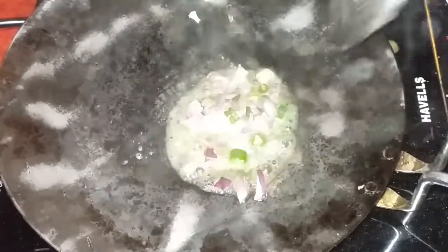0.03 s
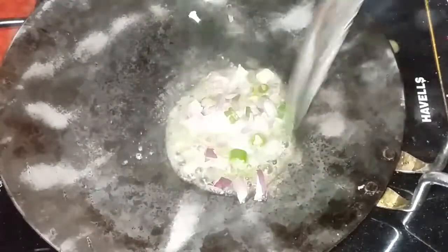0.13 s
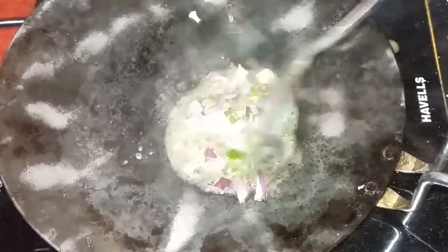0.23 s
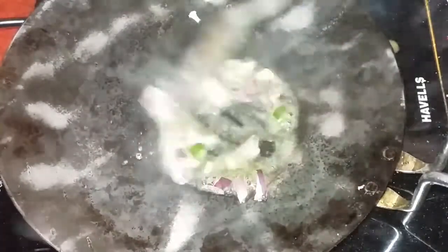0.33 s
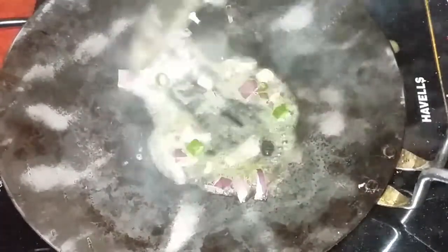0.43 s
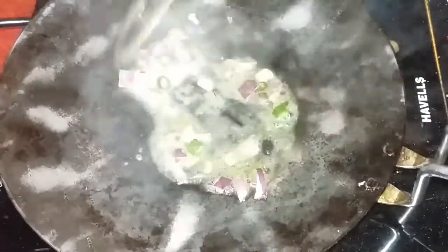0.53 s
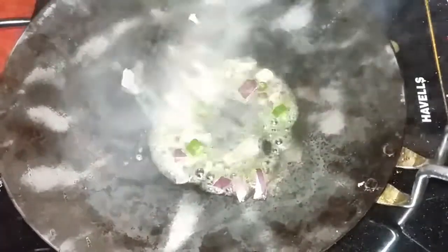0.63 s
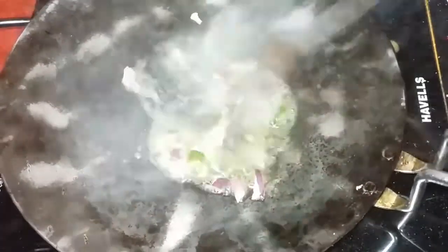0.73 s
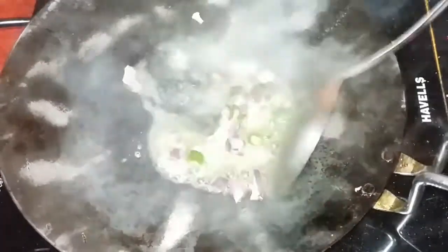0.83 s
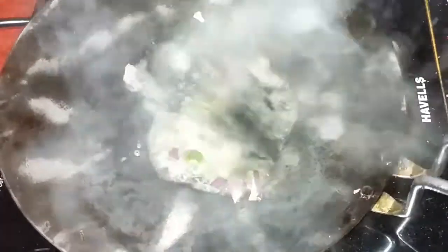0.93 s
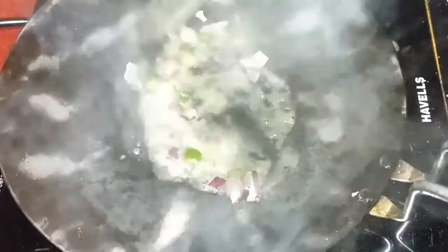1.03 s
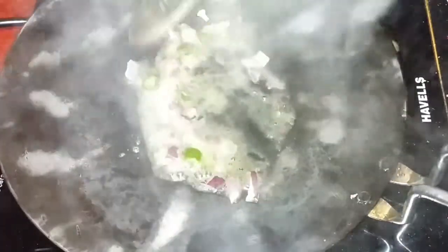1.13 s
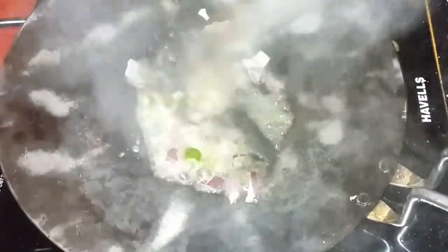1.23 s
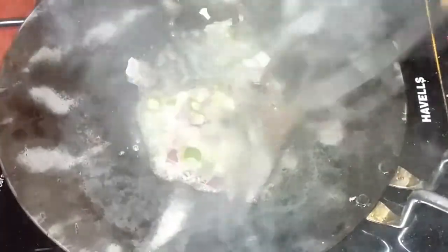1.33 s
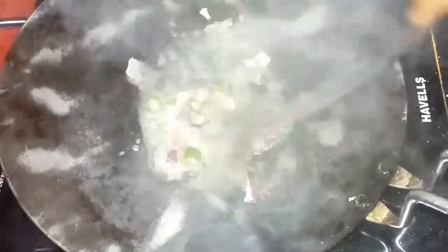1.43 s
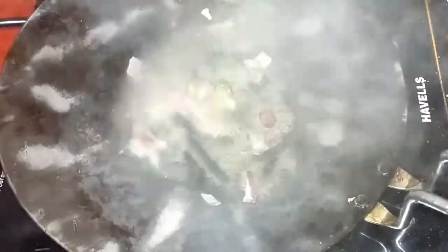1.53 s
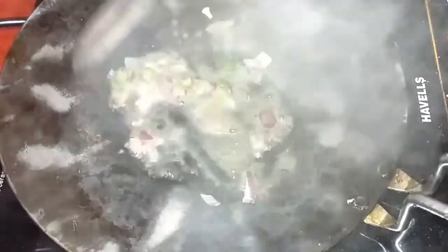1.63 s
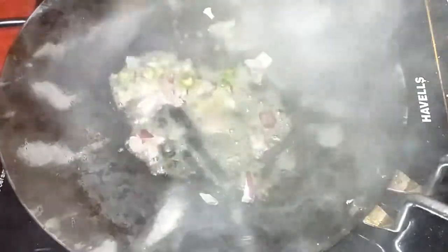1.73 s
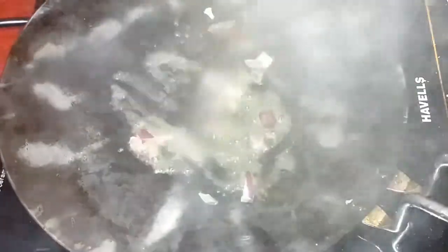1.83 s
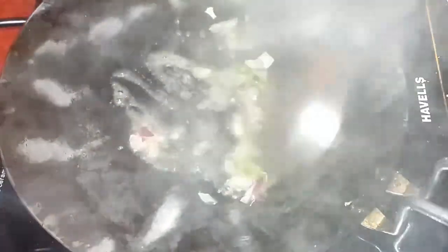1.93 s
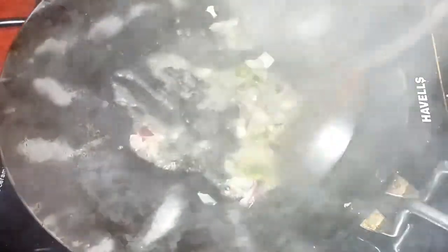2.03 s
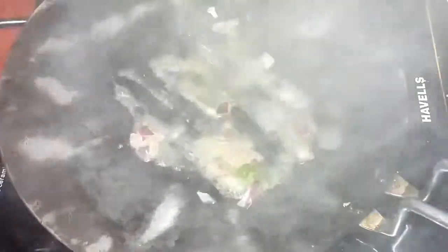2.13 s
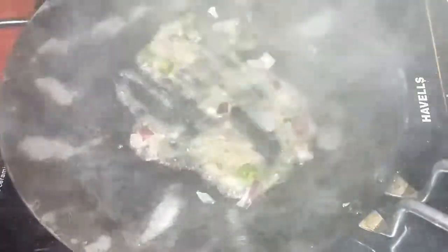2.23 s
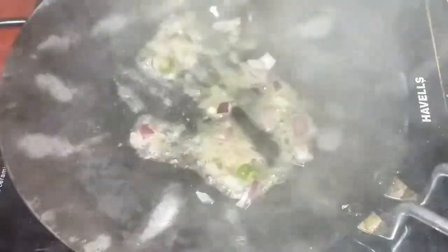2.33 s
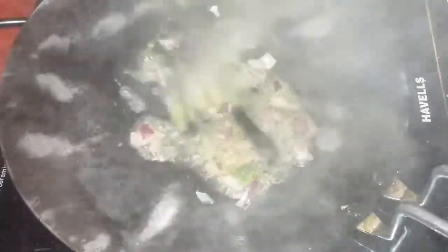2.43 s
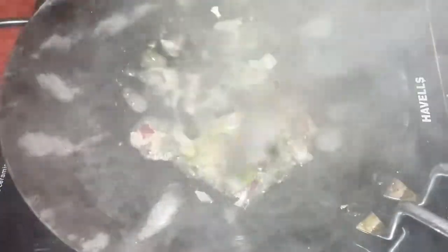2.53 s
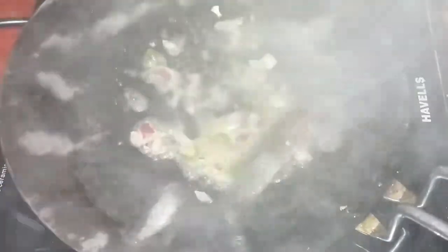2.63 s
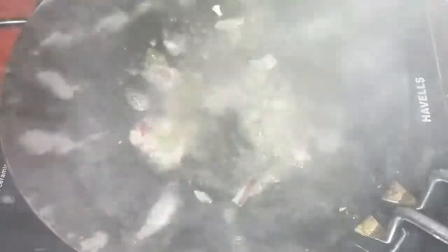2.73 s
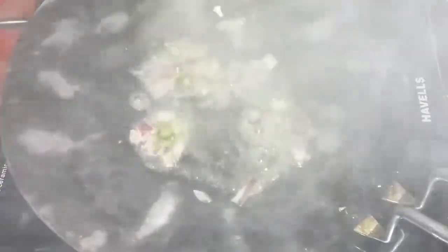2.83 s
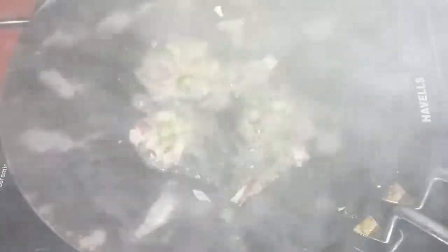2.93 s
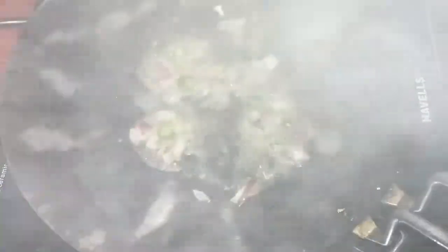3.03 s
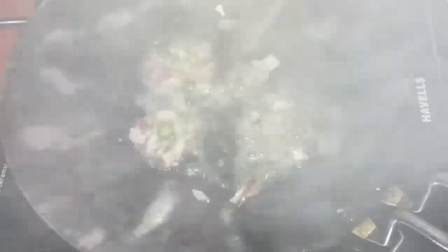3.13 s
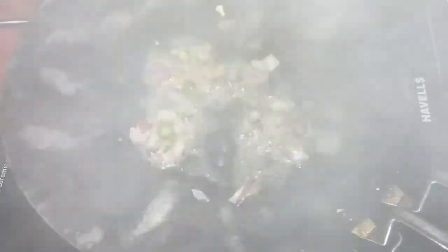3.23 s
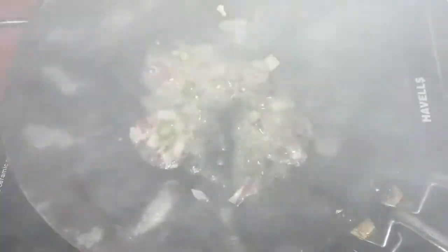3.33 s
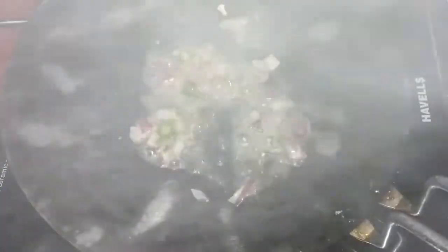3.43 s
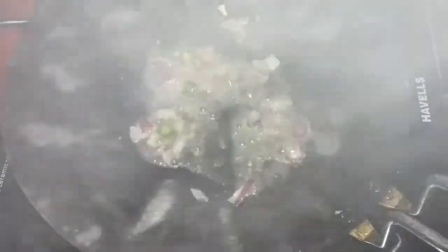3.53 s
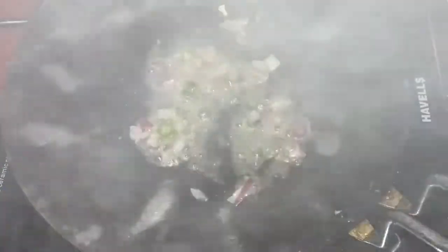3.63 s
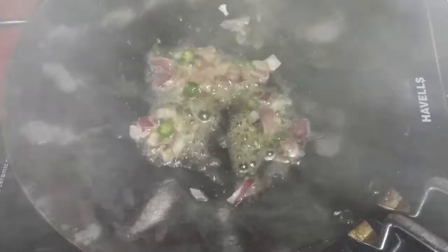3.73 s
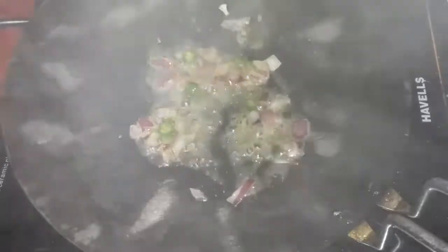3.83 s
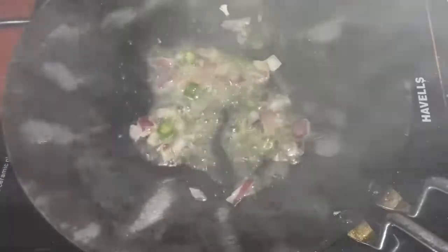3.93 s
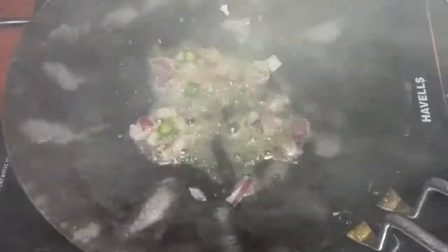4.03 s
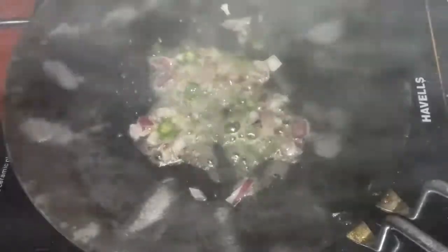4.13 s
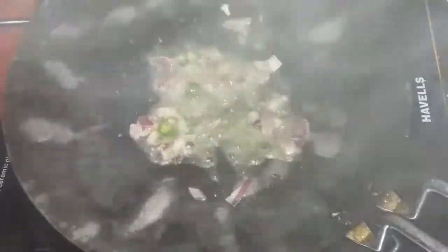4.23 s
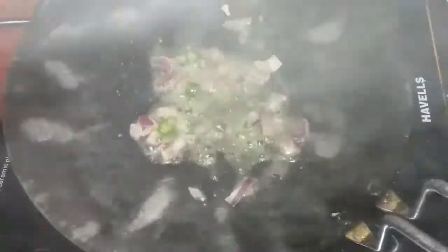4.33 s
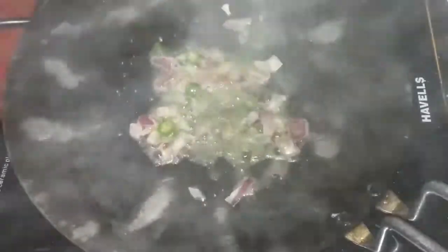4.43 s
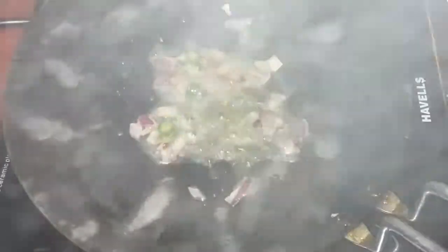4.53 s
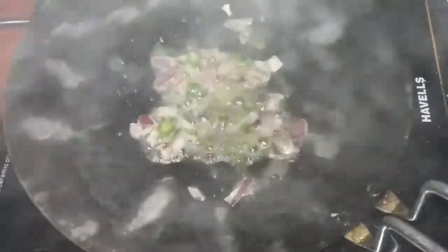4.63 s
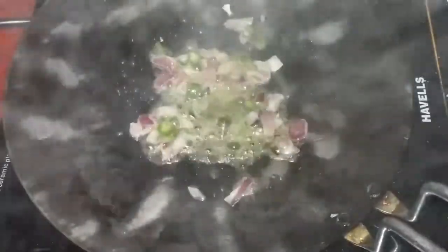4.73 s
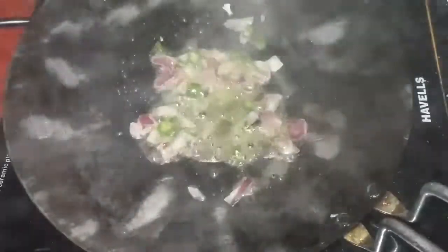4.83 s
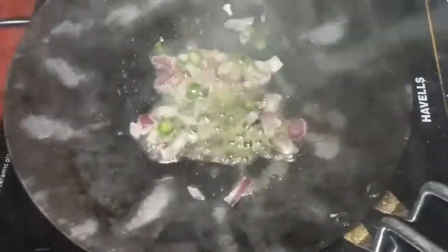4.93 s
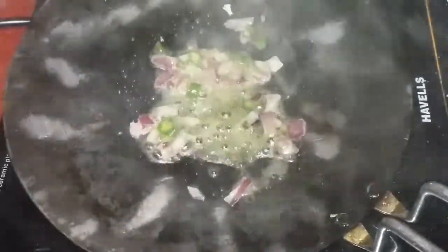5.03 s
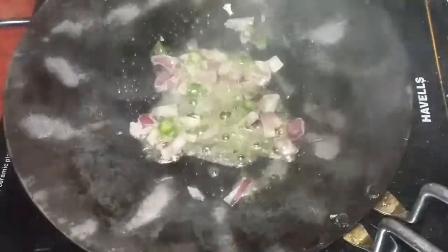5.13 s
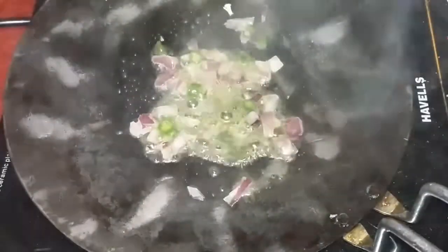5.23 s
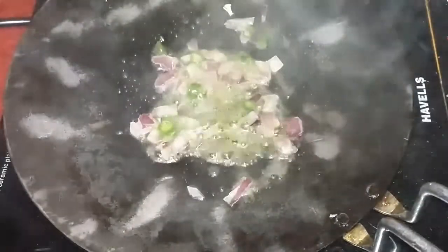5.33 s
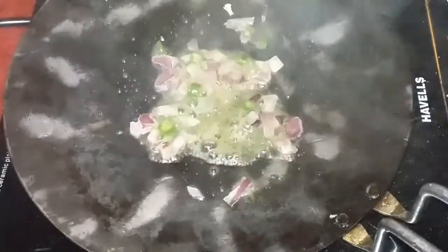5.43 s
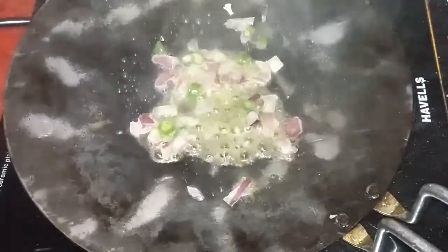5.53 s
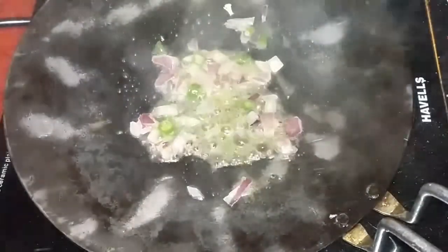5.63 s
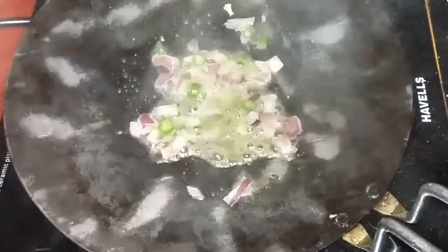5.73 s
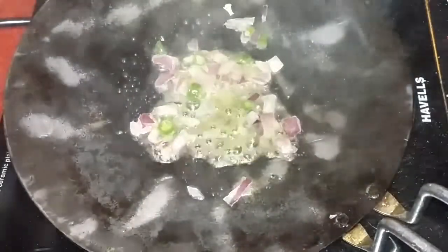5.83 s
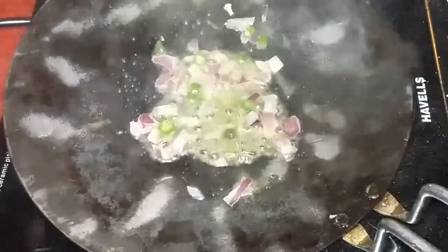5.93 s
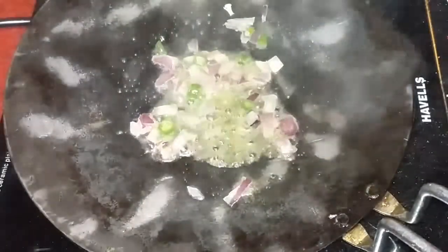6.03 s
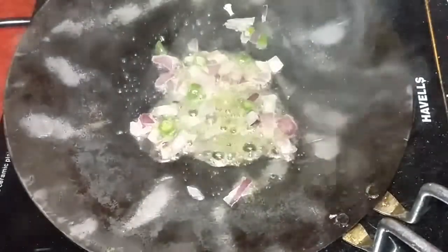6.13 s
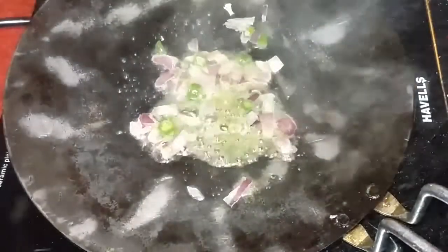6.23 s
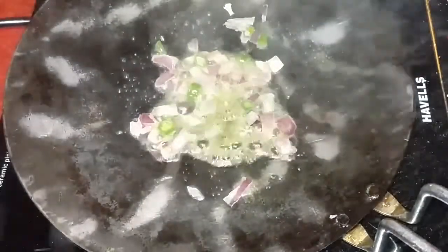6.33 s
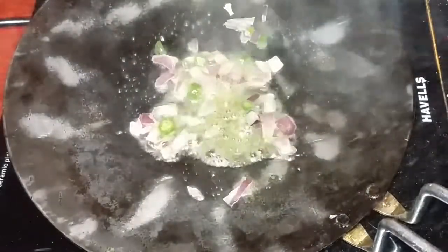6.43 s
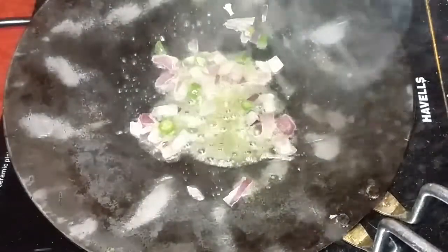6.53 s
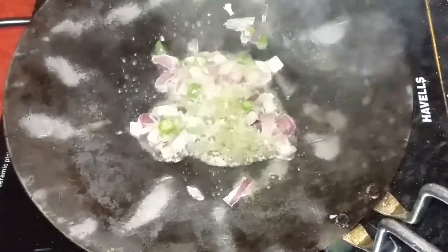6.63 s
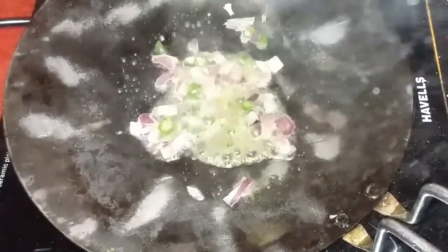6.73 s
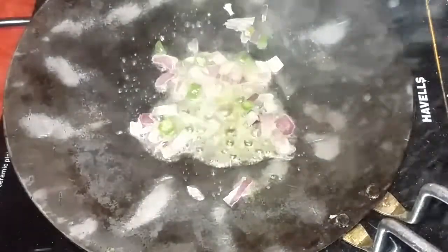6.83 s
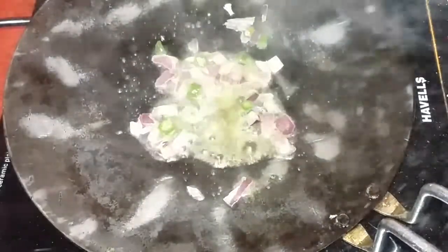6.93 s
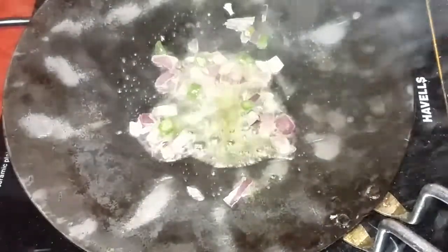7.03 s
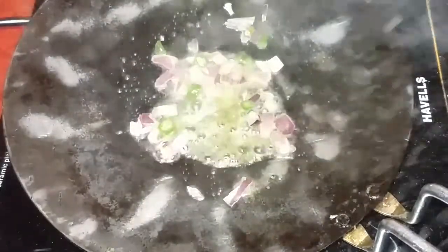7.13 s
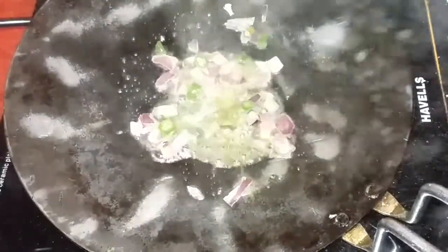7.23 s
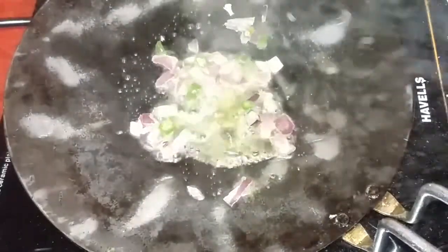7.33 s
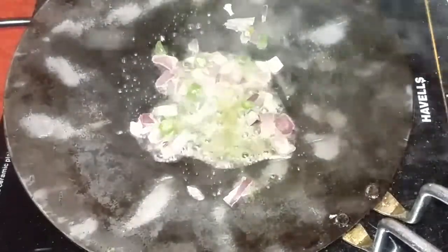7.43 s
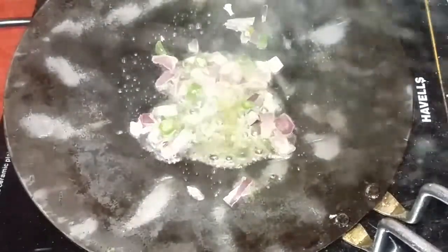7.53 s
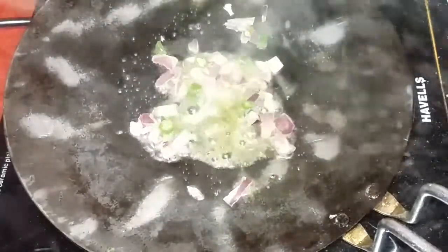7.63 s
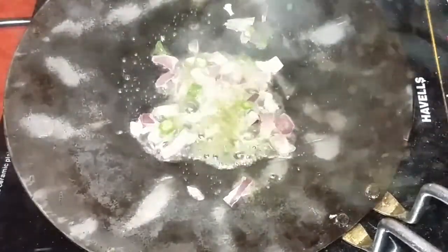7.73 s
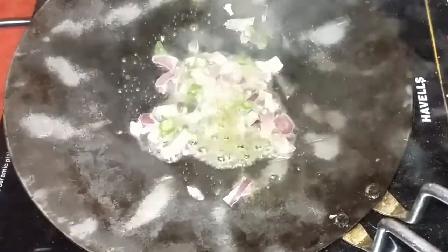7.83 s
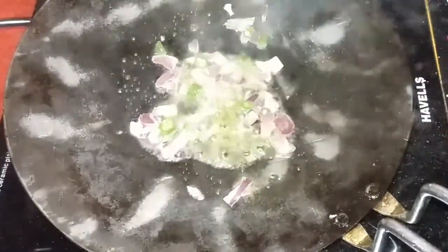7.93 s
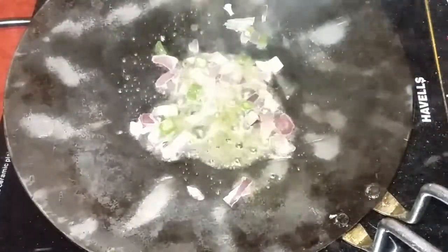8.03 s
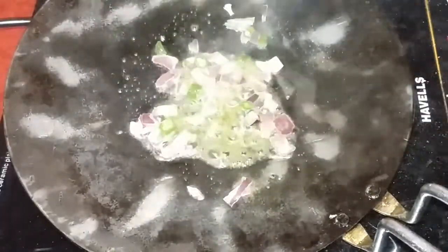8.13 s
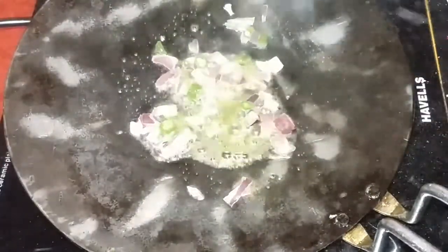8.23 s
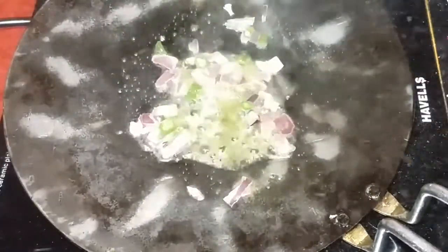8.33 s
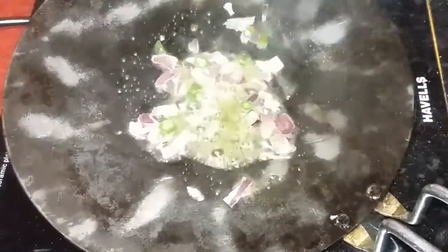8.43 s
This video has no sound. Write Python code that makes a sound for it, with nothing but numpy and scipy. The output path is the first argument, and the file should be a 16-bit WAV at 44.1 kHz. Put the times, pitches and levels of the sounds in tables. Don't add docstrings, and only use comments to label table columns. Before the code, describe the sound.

A steel ladle taps and drags on a hot iron pan, the wet frying surges into loud hiss, then settles to crackling under steady fan hum.

```python
import sys
import numpy as np
from scipy import signal
from scipy.fft import rfft, irfft
from scipy.io import wavfile
from scipy.ndimage import uniform_filter1d, map_coordinates

SR = 44100
rng = np.random.default_rng(int(sys.argv[2]) if len(sys.argv) > 2 else 0)


def materialize(psi):
    bounded = np.clip(np.atleast_2d(psi).T, -1, 1)
    quanta = np.round(bounded * 32767).astype(np.int16)
    wavfile.write(sys.argv[1], SR, quanta)


def invert_db(x):
    u = np.asarray(x, float) / 20
    return 10 ** u


N = 374850

# [f/Hz, level/dB per Hz]
FAN_AIR = [(20, -38), (45, -23.5), (100, -16.5), (170, -14.5), (260, -11), (385, -8), (415, -0.5),
           (500, -2.5), (530, -5.5), (650, -6.5), (900, -8.5), (1150, -7), (1450, -14), (2600, -24.5),
           (4000, -58)]
# [multiple, level/dB against the air noise]
FAN_ORDERS = [(7, -16), (8, -18), (9, -21), (12, -11), (14, -21), (16, -21), (17, -23), (20, -18),
              (21, -14), (22, -21), (24, -24), (28, -4), (30, -26), (32, -27)]
FAN_HZ, FAN_DB = 39.37, -41
BLADE_DB, HUM_DB = 0.16, 0.23

# [f/Hz, level/dB per Hz]
SIZZLE_COLOUR = [(300, -70), (900, -15.5), (1700, -8), (2300, -2.5), (3300, -3), (5000, -1), (6800, -2.5),
                 (8200, -10), (9500, -29), (13000, -60)]
# [f/Hz, level/dB per Hz]
HISS_COLOUR = [(1000, -70), (4000, -36), (7000, -7.5), (8800, -3.5), (10500, 0.5), (12500, 1.5),
               (14000, -.6), (16000, .4)]
TINIEST_HZ = 18000
# [f/Hz, width/Hz, level/dB]
PAN_RING = [(2280, 34, -22.5), (2730, 130, -25.5), (3430, 40, -36), (7000, 220, -29)]
# [t/s, sizzle level/dB]
SIMMER = [(0, -45.5), (.36, -42.5), (.45, -35.5), (1.75, -35.5), (2.1, -35), (2.75, -36.5), (3.2, -36.5),
          (4.0, -37.5), (4.66, -39), (5.2, -42), (6.65, -44.5), (8.5, -47.5)]
# [t/s, sizzle surge/dB, hiss surge/dB, hold/s]
STROKES = [
    (0.405, 6, 6, 0.2),
    (0.993, 6.5, 6.5, 0.17),
    (1.61, 2.5, 2, .12),
    (2.165, 3.5, 5.5, 0.17),
]
HISS_DB, HISS_FOLLOWS, SIMMER_MID_DB = -37.5, 1.27, -38
SURGE_RISE_S, SIZZLE_RISE_S, SURGE_FALL_S = 0.037, 0.091, 0.094

# [t/s, peak level/dB, f/Hz]
EARLY_SPITS = [(0.1096, -34, 6140), (0.1303, -25, 4400), (0.215, -29, 4800), (0.2696, -24, 5420),
               (0.389, -27, 4480), (0.4429, -20, 4530), (0.46, -17, 3970), (0.5102, -16, 4270),
               (0.5461, -16, 3950), (0.5846, -19, 3400)]
# [t/s, peak level/dB, f/Hz]
SPITS = [(3.1015, -24, 5670), (3.2693, -27, 4670), (3.4928, -41, 3630), (3.5142, -24, 5210),
         (3.532, -26, 5190), (3.5874, -25, 5070), (3.6104, -28, 4810), (3.624, -23, 5100),
         (3.7063, -26, 4720), (4.079, -27, 5800), (4.4447, -37, 5690), (4.458, -27, 4330),
         (4.5116, -32, 6150), (4.5399, -25, 6990), (4.6172, -28, 4800), (4.7548, -34, 3950),
         (4.8735, -26.5, 5940), (4.965, -31, 6220), (4.98, -29, 6240), (5.121, -25.5, 6670),
         (5.2304, -27, 6290), (5.5746, -31, 6750), (5.9815, -30, 5300), (6.2185, -26, 6310),
         (6.3943, -33, 6220), (6.423, -26, 6760), (6.6043, -33, 5580), (6.7108, -23.5, 4800),
         (7.5531, -32, 4450), (8.4798, -25.5, 6760)]
# [t/s, peak level/dB, f/Hz]
POPS = [(3.1222, -30, 2450), (3.2693, -26.5, 3000), (3.7062, -31, 3250), (4.0376, -30, 3220),
        (4.08, -27, 2430), (4.1917, -36, 2700), (4.2531, -30, 2310), (4.8572, -27, 2720),
        (4.8887, -27, 2970), (5.2493, -28, 2870), (5.575, -30, 2730), (5.9228, -30, 2870),
        (6.2242, -29, 2960), (6.703, -30, 2960), (6.7776, -29.5, 3050), (6.8796, -33.5, 2590),
        (7.2074, -39, 3350), (7.554, -33, 2750), (7.652, -37, 2760), (8.481, -33, 2270)]
# [t/s, peak level/dB]
SNAPS = [(0.2768, -21), (0.3885, -19), (0.4399, -17), (0.5447, -14), (0.5846, -23), (0.9971, -28),
         (1.0176, -20), (1.1672, -27), (1.6207, -25), (1.8033, -28), (3.1243, -26), (3.268, -27),
         (3.3902, -21), (3.4436, -33), (3.4935, -21), (3.705, -15), (3.769, -15), (3.9215, -15),
         (4.0435, -15), (4.2188, -31), (4.2617, -29), (4.2981, -21), (4.4732, -20), (4.8713, -27),
         (4.9983, -29), (5.1201, -28), (5.2004, -29), (5.4004, -29), (5.6853, -32), (5.7262, -33),
              (5.8669, -33), (5.9796, -31), (6.2989, -31), (6.3553, -23), (6.4216, -32), (6.454, -27),
              (6.5513, -27), (6.5807, -33), (6.6037, -30), (6.701, -15), (6.7349, -32), (6.8362, -31),
              (6.8786, -36), (6.9444, -32), (6.9918, -25), (7.2073, -26), (7.2372, -27), (7.4258, -31),
              (7.8194, -26), (8.4794, -26)]
EARLY_CYCLES, SPIT_CYCLES, POP_CYCLES = 3.6, 2.6, 1.6
STRAYS, STRAY_DB, STRAY_SPREAD_DB = 60, 14.0, 4.0
STRAYS_FROM_S = 2.8
TICKS_PER_S, TICK_DB, TICK_FOLLOWS = 120, -23.5, .6

# [t/s, delay/ms, share 0-1]
ECHO = [(0, 0.42, 0.04), (4.4, .41, .06), (4.75, 0.46, .15), (5.0, .3, 0.1), (5.9, 0.39, 0.1),
        (7.1, 0.374, 0.15), (7.42, 0.48, 0.26), (7.62, .39, 0.18), (8.5, .34, 0.1)]

# [f/Hz, time to fall 60 dB/s]
IRON = [(409, .15), (705, 0.14), (1098, 0.27), (1500, 0.03), (1852, 0.2), (2300, .12), (2417, 0.081),
        (2590, 0.11), (2697, 0.079), (2869, 0.072), (3030, 0.085), (3290, 0.16), (3610, 0.092),
        (3930, 0.13), (4510, .08), (4750, 0.12), (5350, .08), (5520, 0.064), (6470, 0.14), (6700, 0.065),
        (7400, 0.096), (7720, 0.17)]
# [t/s, tap level/dB, drag start level/dB, drag end level/dB, drag length/s]
CONTACTS = [
    (0.387, -54, -36, -35.5, 0.12),
    (0.5837, -17, -23.5, -25.5, 0.056),
    (0.638, -38, -20, -20, 0.029),
    (.8955, -17.5, -18.5, -35, 0.05),
    (1.142, -18, -16.5, -43, 0.072),
    (1.428, -15, -17, -42, 0.081),
    (1.7856, -13, -21, -24.5, 0.048),
    (1.853, -28.5, -20, -30, 0.024),
]
PRESSED_RING = [0.53, 0.61, 0.9, 0.56, 0.62, 0.55, 0.63, 0.47]
SWING_DB = [-4, -12.5, -6.5, -29, -12, 1.5, -1, 7, 3.5, 3.5, -1.5, -5, 0.5, -0.5, 1, -7, -3, -0.5, -2.5, -5,
            -7, -11]
SWINGING = [(2300, 2697, 3610, 4510), (2300, 2590, 2869, 3290), (2300, 5520, 6700),
            (1098, 1500, 2300, 2697, 2869, 3030, 3290, 3930, 4750, 5520, 6700),
            (2300, 2417, 2590, 2869, 3030, 3290),
            (409, 705, 1098, 1852, 2300, 2697, 2869, 3290, 3930, 4750, 5520, 6470, 7720),
            (2300, 2417, 2590, 2697, 3030, 3290, 3930, 4510, 5520), (2300, 3030, 3610, 7400)]
STILL_DB, STILL_SPREAD_DB = -13.5, 1
# [f/Hz, width/Hz, level/dB]
CLANK = [(1340, 1600, -35), (2870, 1900, -12), (4300, 1100, -4), (6140, 840, -2)]
BOUNCE_S, BOUNCE_DB = .0044, -11
LIFT_S = 0.0056
# [f/Hz, level/dB, time to fall 60 dB/s]
BOWL = [(1472, -19.5, 0.66), (1852, -11, 0.11)]
BOWL_S, BOWL_STOP_S = .899, 1.08

# [t/s, gain level/dB]
GAIN = [
    (0, -.5),
    (1.65, 1),
    (2.03, -6),
    (2.76, -8),
    (3.05, -3),
    (3.26, 0),
    (8.5, 0),
]
# [f/Hz, side as a signed share of mid]
PORTS = [(1900, 0), (3000, -.16), (4200, -.36), (5500, -.5), (6500, -.42), (7400, -.28), (8300, 0),
         (8800, 0), (9600, .17), (11000, .18), (12500, .12), (13300, 0)]
CUTOFF_HZ = 15740


def rms_one(x):
    return x / np.sqrt(np.mean(x ** 2) + 1e-20)


def in_time(rows):
    s, *columns = np.transpose(rows)
    return [np.interp(np.arange(N) / SR, s, c) for c in columns]


def coloured(x, spectrum):
    hz, level_db = np.transpose(spectrum)
    grid = np.arange(N // 2 + 1) * SR / N + 1
    gain = invert_db(np.interp(np.log(grid), np.log(hz), level_db))
    return rms_one(irfft(rfft(x) * gain, N))


def drift(rate):
    r = np.exp(-80 * np.pi * rate / SR)
    slow = signal.lfilter([1], [1, -2 * r, r * r], rng.standard_normal(N // 40 + 2002))[2000:]
    return np.interp(np.arange(N) / 40, np.arange(len(slow)), rms_one(slow))


def ring(clicks, hz, t60):
    r = invert_db(-60 / (t60 * SR))
    w = 2 * np.pi * hz / SR
    return signal.lfilter([0, np.sin(w)], [1, -2 * r * np.cos(w), r * r], clicks + 1e-18)


def fan():
    turn = 2 * np.pi * FAN_HZ * np.arange(N) / SR + 0.0093 * drift(1.7)
    tones = 0
    for multiple, level_db in FAN_ORDERS:
        trim_db = BLADE_DB if multiple == 28 else HUM_DB
        level = invert_db(level_db + trim_db + 0.44 * drift(9.5))
        tones = tones + level * np.sqrt(2) * np.sin(multiple * turn + rng.uniform(0, 2 * np.pi))
    return invert_db(FAN_DB) * (coloured(rng.standard_normal(N), FAN_AIR) + tones)


def vigour():
    sizzle_db, = in_time(SIMMER)
    hiss_db = HISS_DB + HISS_FOLLOWS * (sizzle_db - SIMMER_MID_DB)
    t = np.arange(N) / SR
    for s, sizzle_up_db, hiss_up_db, hold_s in STROKES:
        dying = np.exp(-np.maximum(t - s - SURGE_RISE_S - hold_s, 0) / SURGE_FALL_S)
        hiss_db = hiss_db + hiss_up_db * dying * np.clip((t - s) / SURGE_RISE_S, 0, 1)
        sizzle_db = sizzle_db + sizzle_up_db * dying * np.clip((t - s) / SIZZLE_RISE_S, 0, 1)
    return hiss_db, sizzle_db


def bursts(low_hz, high_hz, per_s, spread_db, cycles, clump_db, smooth_db):
    sizes = invert_db(spread_db * np.minimum(rng.exponential(1, N), 5)) * rng.choice([-1, 1], N)
    born = rng.random(N) < per_s * invert_db(clump_db * drift(30)) / SR
    dealt = rng.integers(0, 16, N)
    grains = 0
    for k, hz in enumerate(np.geomspace(low_hz, high_hz, 16)):
        grains = grains + hz * ring(sizes * born * (dealt == k), hz, cycles / hz)
    return rms_one(grains) + invert_db(smooth_db) * rng.standard_normal(N)


def frying():
    hiss_db, sizzle_db = vigour()
    swell = drift(29)
    sizzle = bursts(1720, 7680, per_s=2500, spread_db=4.0, cycles=18, clump_db=2.5, smooth_db=9)
    hiss = bursts(6500, TINIEST_HZ, per_s=5000, spread_db=-0.5, cycles=16.0, clump_db=1.5, smooth_db=-5.5)
    sizzle += sum(invert_db(level_db) * rms_one(ring(sizzle, hz, 9.6 / width)) * 2
                  for hz, width, level_db in PAN_RING)
    sizzle = invert_db(sizzle_db + 0.8 * swell + 0.5 * drift(40)) * coloured(sizzle, SIZZLE_COLOUR)
    return sizzle + invert_db(hiss_db + 0.73 * swell) * coloured(hiss, HISS_COLOUR)


def stray_drops(sizzle_db):
    when, size, pitch = rng.random((STRAYS, 3)).T
    at = (N - 1 - when * (N - STRAYS_FROM_S * SR)).astype(int)
    level_db = sizzle_db[at] + STRAY_DB + STRAY_SPREAD_DB * size
    return np.transpose([at / SR, level_db, 2300 * 2 ** (1.5 * pitch)])


def spits():
    out, t = np.zeros(N + 900), np.arange(900) / SR
    hiss_db, sizzle_db = vigour()
    kinds = [(EARLY_SPITS, EARLY_CYCLES, 3.0), (SPITS, SPIT_CYCLES, 9.5), (POPS, POP_CYCLES, 9.5),
             (stray_drops(sizzle_db), SPIT_CYCLES, 0)]
    for drops, cycles, trim_db in kinds:
        for s, peak_db, hz in drops:
            swell_and_die = np.exp(-t * hz / cycles) * (1 - np.exp(-t * hz / .8))
            pop = np.sin(2 * np.pi * hz * t) * swell_and_die
            spray = rng.standard_normal(900) * np.exp(-t / 0.0054)
            tail = invert_db(-23.5) * ring(spray, hz, 0.00059)
            out[round(s * SR):][:900] += invert_db(peak_db + trim_db) * (pop + tail)
    tick_db = 4.0 * np.minimum(rng.exponential(1, N), 2) + TICK_DB + TICK_FOLLOWS * (hiss_db - HISS_DB)
    clicks = invert_db(tick_db) * (rng.random(N) < TICKS_PER_S / SR)
    for s, peak_db in SNAPS:
        clicks[round(s * SR) + 8] = invert_db(peak_db + 9)
    clicks *= rng.choice([-1, 1], N)
    bright = signal.butter(2, [3500, 14000], "band", fs=SR, output="sos")
    return out[:N] + signal.sosfilt(bright, clicks)


def hob_echo(x):
    delay_ms, share = in_time(ECHO)
    late = map_coordinates(x, [np.arange(N) - delay_ms * SR / 1000], order=3)
    return (x + share * late) / np.sqrt(1 + share ** 2)


def bowl():
    t = np.maximum(np.arange(N) / SR - BOWL_S, 0)
    damped_db = -150 * np.maximum(t - (BOWL_STOP_S - BOWL_S), 0)
    tones = sum(invert_db(level_db - 60 * t / t60 + damped_db) * np.sin(2 * np.pi * hz * t)
                for hz, level_db, t60 in BOWL)
    return tones * (1 - np.exp(-t / 0.002))


def ladle():
    out, length = np.zeros(N), SR // 2
    t = np.arange(length) / SR
    side = np.tile([1, -1, -1, -1, -1, 1, 1, 1], 3)
    for (s, tap_db, start_db, end_db, drag_s), swinging, free in zip(CONTACTS, SWINGING, PRESSED_RING):
        still_db = STILL_DB + STILL_SPREAD_DB * rng.standard_normal(len(IRON))
        place_db = SWING_DB + still_db * ~np.isin(np.array(IRON)[:, 0], swinging)
        roughness = invert_db(1.3 * rng.standard_normal(length // 40 + 1)).repeat(40)[:length]
        grit = rng.standard_normal(length) * roughness
        drag_db = start_db + (end_db - start_db) * np.minimum(t / drag_s, 1)
        drag = invert_db(drag_db) * grit * np.exp(-np.maximum(t - drag_s, 0) / LIFT_S)
        push = invert_db(-27.5) * drag
        push[[0, round(BOUNCE_S * SR)]] += invert_db(tap_db + np.array([0, BOUNCE_DB]))
        detune = 1 + 0.0012 * rng.standard_normal(len(IRON))
        modes = sum(side[k] * invert_db(place_db[k]) * ring(push, hz * detune[k], t60 * free)
                    for k, (hz, t60) in enumerate(IRON))
        crash = np.exp(-t / 0.00047) + invert_db(-13) * np.exp(-t / 0.065)
        shock = invert_db(tap_db - 11) * grit * crash + invert_db(-18.0) * drag
        clank = sum(invert_db(level_db) * ring(shock, hz, 0.98 / width) for hz, width, level_db in CLANK)
        out[round(s * SR):][:length] += modes + clank
    no_bass = signal.butter(4, 330, "high", fs=SR, output="sos")
    return signal.sosfilt(no_bass, out)


def scene():
    food = hob_echo(frying() + spits())
    return np.tile(fan() + food + bowl() + ladle(), (2, 1))


def roll_off(x):
    return signal.sosfilt(signal.butter(12, 17000, fs=SR, output="sos"), x)


def record(dry):
    mid = dry.mean(0) * invert_db(in_time(GAIN)[0])
    over_db = np.maximum(20 * np.log10(np.abs(mid) + 1e-9) + 12, 0)
    fall = 250 * np.arange(N) / SR
    held = np.maximum.accumulate(over_db + fall) - fall
    duck_db = uniform_filter1d(np.append(held[380:], np.zeros(380)), size=200)
    grid = np.arange(N // 2 + 1) * SR / N
    bass_cut = grid ** 2 / (grid ** 2 + 45 ** 2)
    mid = rfft(mid * invert_db(-.45 * duck_db)) * (grid < CUTOFF_HZ) * bass_cut
    hz, share = np.transpose(PORTS)
    side = mid * np.interp(grid, hz, share)
    mix = irfft(np.array([mid + side, mid - side]), N)
    return roll_off(mix)


dry = scene()
out = record(dry)
materialize(out)
```